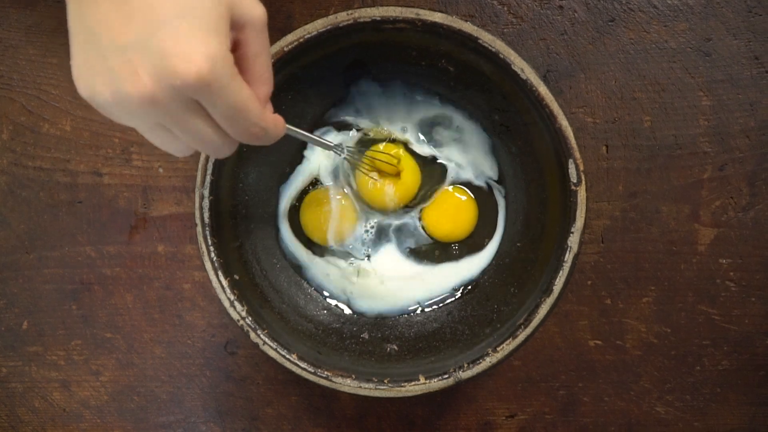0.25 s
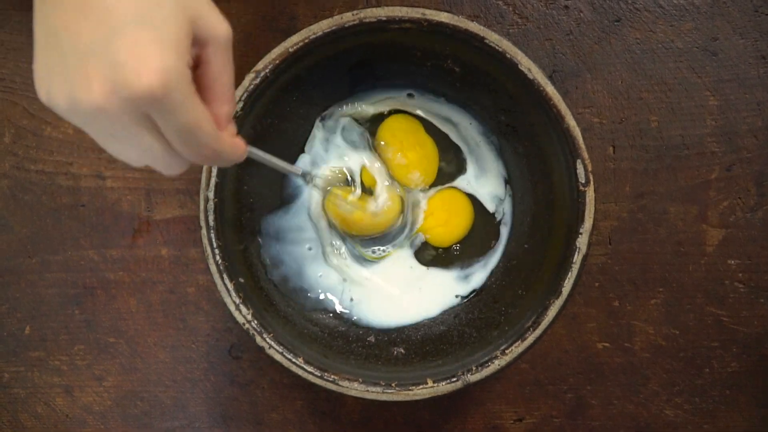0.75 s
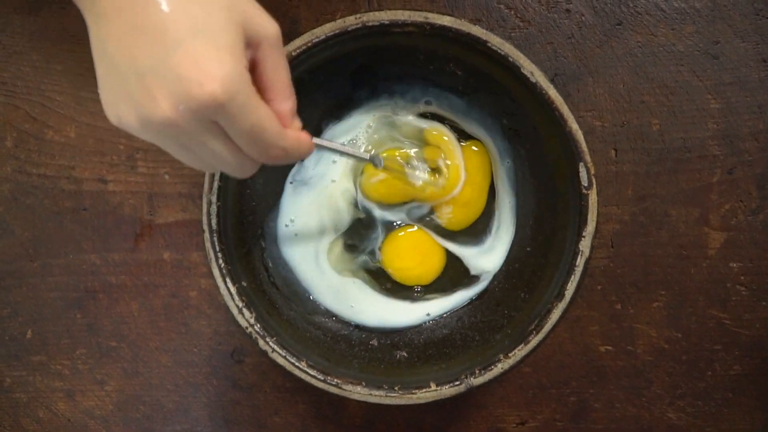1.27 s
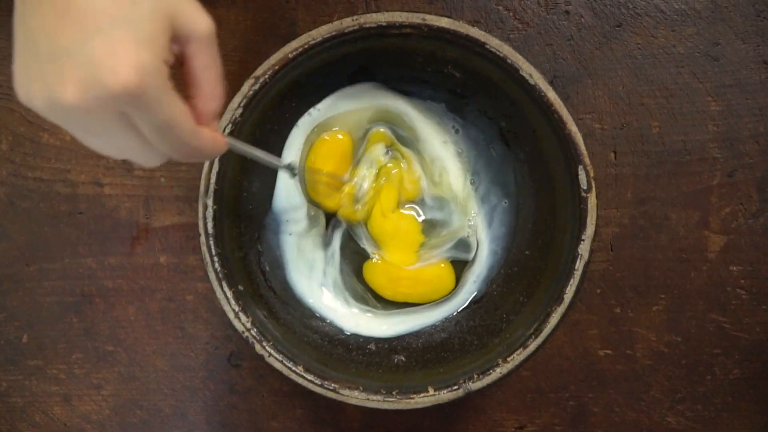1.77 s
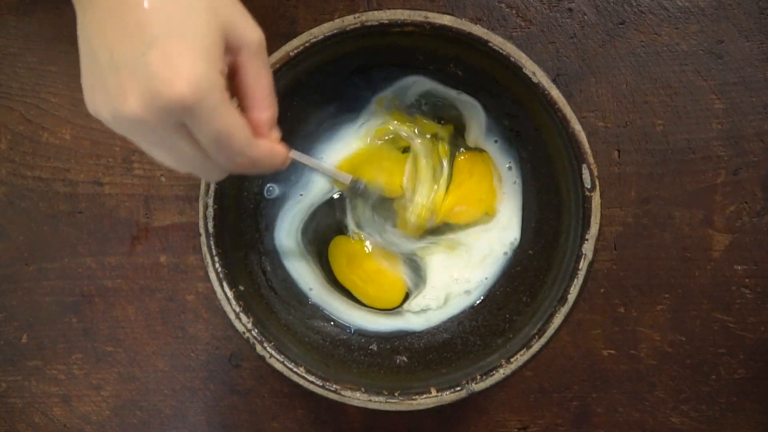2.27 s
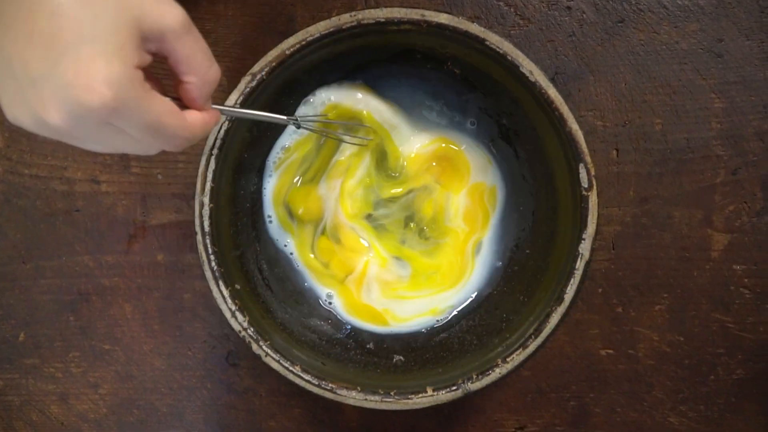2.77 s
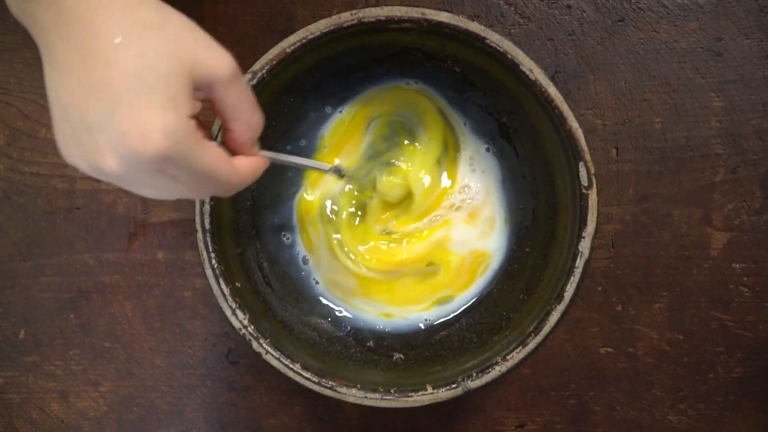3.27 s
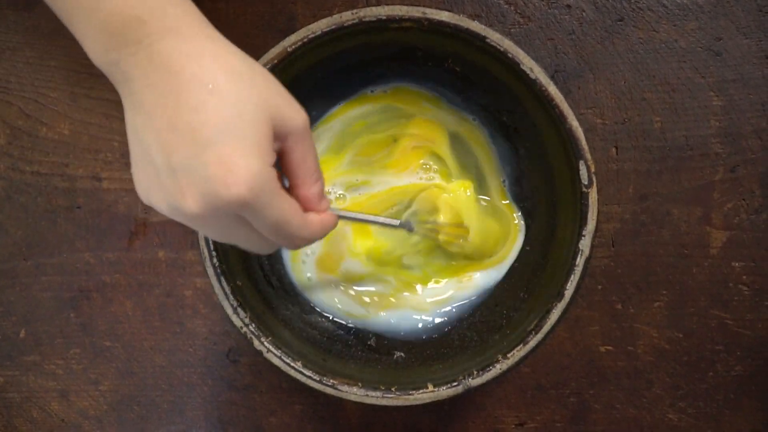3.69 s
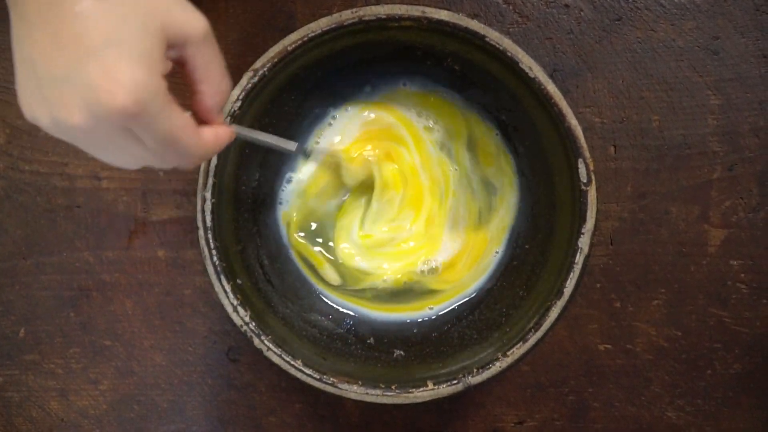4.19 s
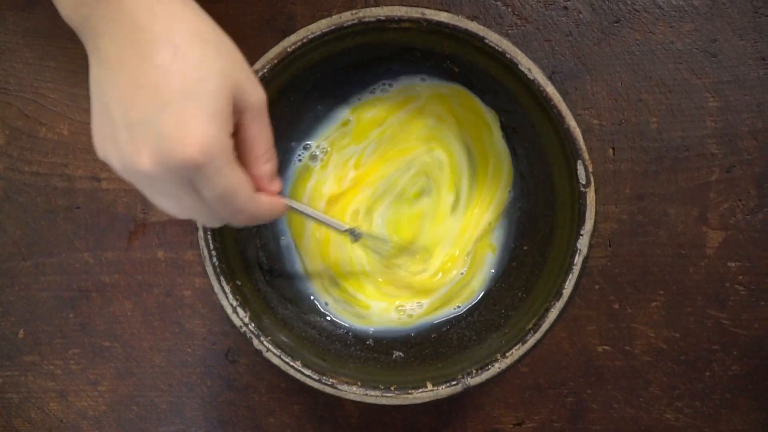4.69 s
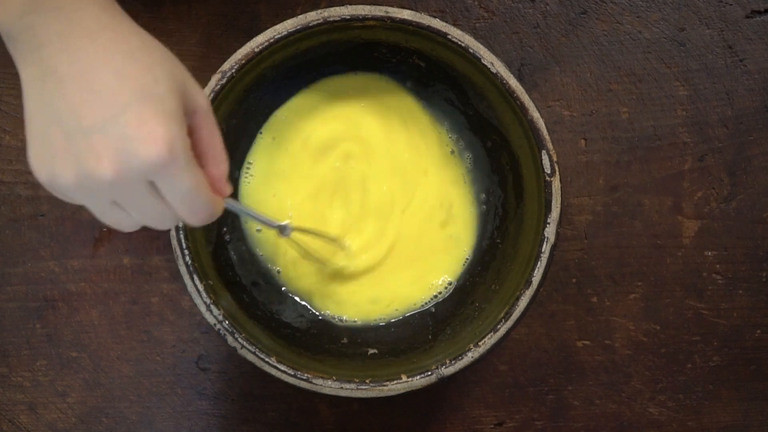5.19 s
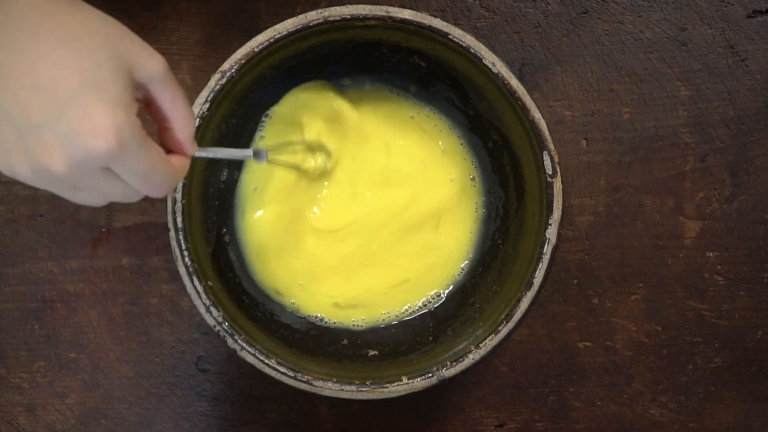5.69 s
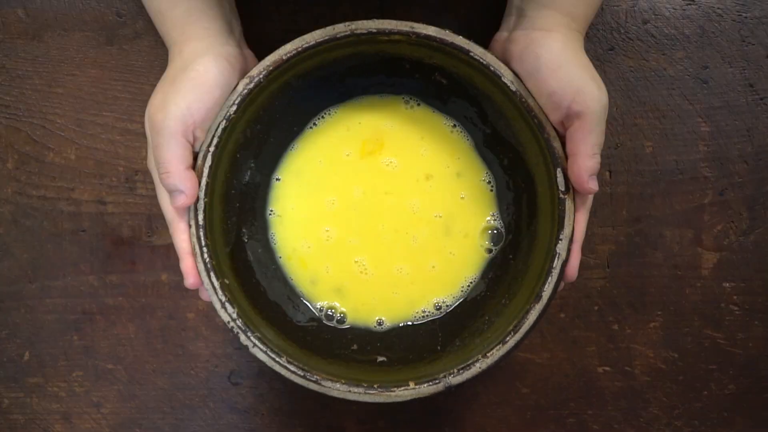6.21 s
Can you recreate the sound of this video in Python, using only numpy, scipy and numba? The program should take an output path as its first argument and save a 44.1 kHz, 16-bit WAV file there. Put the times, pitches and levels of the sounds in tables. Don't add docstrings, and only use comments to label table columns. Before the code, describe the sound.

Close up, a small wire whisk beats eggs in a stoneware bowl. Separate scraping ticks come first, loosely spaced, then strokes crowd together into a brisk clatter before settling to even strokes several times a second. Each lands with a sharp tick, chatters brightly over rough glaze and stops short, with damped ceramic clinks and small thuds beneath. Tiny wet pops fall between. The kitchen is quiet, with low hum and hiss and a brief room tail.

```python
import sys
import numpy as np
from scipy import signal
from scipy.fft import rfft, irfft
from scipy.io import wavfile
from scipy.ndimage import uniform_filter1d
from numba import njit

SR = 44100
rng = np.random.default_rng(int(sys.argv[2]) if len(sys.argv) > 2 else 0)


def boost_factor(decibels):
    exponent = np.asarray(decibels, float) / 20
    return 10 ** exponent


def to_wav(s):
    ch = np.atleast_2d(s).T
    pcm = np.round(np.clip(ch, -1, 1) * 32767)
    wavfile.write(sys.argv[1], SR, pcm.astype(np.int16))


N = 284438


def whisk(catches):
    t = np.arange(N) / SR
    force, flank_db, sing_hz, sheen_db = pressure(t)
    ticks, knocks, wall_hz, upper_hz = landings(t)
    wire, tip, wall, upper, base = force[[0, 0, 1, 2, 3]] * chatter(
        slips_per_s=12000, spread_db=1.83, judder_db=0.5, judder_hz=157.0, count=5)
    wire = wire + boost_factor(-8.0) * ticks
    tip = tip + boost_factor(-8.5) * ticks
    wall = wall + boost_factor(-4.5) * knocks
    upper = upper + boost_factor(-8.0) * knocks
    base = base + boost_factor(-25.0) * knocks

    wall_now = wall_hz * (1 + .025 * walk(60))
    upper_now = upper_hz * (1 + .035 * walk(60))
    bowl = ringing_wires(wire) + hissing_tips(tip, sheen_db) + singing_wire(tip, sing_hz)
    body = bowl_wall(wall, upper, wall_hz, wall_now, upper_now)
    body += bowl_flank((wall + wire) * boost_factor(flank_db))
    bowl += svf(body, np.full(N, 3100.), 1530.0)
    bowl += bowl_base(base, t)
    bowl -= 0.66 * svf(bowl, np.full(N, 3180.), 360.0)
    bowl -= 0.38 * svf(bowl, np.full(N, 1500.), 320.0)
    too_small_for_bass = signal.butter(2, 260, "high", fs=SR, output="sos")
    bowl = signal.sosfilt(too_small_for_bass, bowl)

    wall = wall + boost_factor(-16) * catches
    bowl += boost_factor(-28) * ring(wall, (wall_now + wall_hz) / 2, width=9)
    return bowl + free_rim(wall + upper, wire)


# touch-down in seconds,
# rise in seconds, fall in seconds, crest of the chatter in dB, touch-down against the crest in dB.
YOLK_STROKES = [(0.14, 0.0049, 0.051, -33, -2), (.213, 0.012, 0.03, -28, -24),
                (0.264, 0.026, 0.011, -30, -4), (0.415, 0.0017, 0.0095, -48, 13.5),
                (0.691, 0.059, 0.031, -27.5, -8), (0.875, 0.02, 0.016, -27, -13),
                (1.218, 0.021, 0.0073, -32, -3.5), (1.567, 0.031, 0.041, -24, -7.5),
                (1.647, 0.01, 0.0074, -39.5, 2), (1.89, 0.0095, 0.0093, -39.5, 12),
                (1.931, 0.0021, 0.03, -26, -1), (2.062, 0.031, 0.015, -30.5, 3.5),
                (2.208, 0.024, 0.0031, -23, -4), (2.378, 0.018, 0.0063, -26, 8),
                (2.533, 0.014, 0.014, -25, 2.5)]
BEAT_STROKES = [(2.771, 0.022, 0.032, -27.5, -10), (2.928, 0.036, 0.042, -23.5, -13),
                (3.103, 0.059, 0.052, -21.5, -21), (3.288, 0.0093, 0.0034, -31.5, 9),
                (3.311, 0.028, 0.0069, -24, -5), (3.3513, 0.0099, 0.036, -36, 11.5),
                (3.47, 0.0025, 0.01, -39, 14), (3.485, 0.02, 0.026, -20.5, -5),
                (3.539, 0.0042, 0.044, -28, -7), (3.657, 0.03, 0.054, -28, -14.5),
                (3.749, 0.016, 0.0056, -35.5, -4), (3.79, 0.016, 0.029, -22.5, 1.5),
                (3.837, 0.041, 0.014, -22.5, -15), (3.999, 0.055, 0.016, -24, -13)]
FINAL_STROKES = [(4.211, 0.0084, 0.012, -31, 3), (4.397, 0.015, 0.015, -24.5, -28),
                 (4.582, 0.0013, 0.016, -20.5, -2), (4.599, 0.017, 0.012, -25.5, -1),
                 (4.683, 0.0029, 0.012, -36.5, -16), (4.7712, 0.0016, 0.0047, -34, 11),
                 (4.781, 0.012, .003, -31, -13), (4.796, 0.035, 0.007, -19, -0.5),
                 (4.839, 0.053, .005, -36.5, 6.5), (4.983, 0.024, 0.0077, -27, 8),
                 (5.159, 0.016, 0.0038, -28, 1), (5.337, 0.021, 0.011, -30.5, 0),
                 (5.523, 0.029, 0.0099, -33.5, 4), (5.714, 0.016, 0.0022, -38.5, 2.5),
                 (6.052, 0.022, 0.0081, -27, -4)]
# wall ring, upper ring and flank ring against
# the chatter, all in dB, base thud in dB, pitch of the singing wire in Hz.
YOLK_CONTACTS = [(9, 12.5, -15, -38.5, 5800), (4.5, 10.5, -5.5, -39.5, 9700), (7.5, 6.5, -11, -42, 8600),
                 (20.5, -7, -23, -47, 6200), (1, 5.5, -7.5, -31, 8780), (9.5, 4.5, -12, -34, 8790),
                 (12.5, -1, -11, -37.5, 5750), (12.5, 5, -9.5, -33, 6980), (15, 10, -9, -40, 6800),
                 (0, -7, -19, -43.5, 8400), (-25, -1, -21, -34.5, 6460), (7, 9, -14, -33, 6200),
                 (7.5, 9.5, -10, -30, 6200), (11, 2.5, -16, -36.5, 8400), (5, 3.5, -8, -34, 7670)]
BEAT_CONTACTS = [(0.5, 3.5, -23, -34, 6720), (-6.5, 1.5, -11, -32.5, 6530), (-6, 3, -13, -32, 7300),
                 (7, -16, -16, -36, 6200), (8.5, 6.5, -9.5, -34.5, 8440), (11, 12.5, -13.5, -32.5, 9100),
                 (6, 14, -37, -44, 10680), (10.5, 4, -18, -33.5, 8000), (-1, 6, -12, -29.5, 6720),
                 (4, 6.5, -13.5, -30.5, 6400), (-2, -1, -5.5, -31.5, 8530), (-7.5, 1, -10, -29.5, 5500),
                 (2, 9, -12, -32, 5800), (6, 10, -10, -28, 4800)]
FINAL_CONTACTS = [(8, 7, -39, -39, 6940), (9, 5.5, -10, -33, 7100), (-1, 3.5, -32, -34.5, 6630),
                  (7.5, 5, -18, -39, 6030), (11, 13.5, -21, -33.5, 7400), (-9, 18.5, -38, -31, 12570),
                  (1, 13, -16, -41, 7490), (5.5, 5, -11, -34, 7430), (8.5, 6, -12, -32, 6720),
                  (4, 4.5, -9, -36.5, 5800), (10, 0, -4, -35.5, 4670), (10.5, 4, -1.5, -30, 4660),
                  (8.5, 5.5, -6, -31.5, 4995), (-7, -2.5, -15, -38.5, 8400), (11, -1, -8.5, -33.5, 5800)]
TIP_SHEEN_DB = [1, 1, -4, -0.5, 3.5, -2, 2.0, 2.0, -6.0, -7.0, 1.0, 10.0, 0.2, 4.0, 1.5, 2.5, 1.5, 9, 5.5,
                5, 3.5, 9.5, 5, -1, 0, 0.2, 3, 1.5, 3, 1.1, 3, 3, 4, 4.0, 9.0, 6.5, 1.5, 0, 0.2, 1, 2.5,
                4.0, 4, -0.5]


def pressure(t):
    lift_db, roundness = -13.5, 1.97
    wall_growth_db, upper_growth_db, base_growth_db = 5, 2, 0.5
    base_follow = 0.31
    at, rise, fall, crest_db, touch_db = np.transpose(YOLK_STROKES + BEAT_STROKES + FINAL_STROKES)
    stroke = np.maximum(np.searchsorted(at, t) - 1, 0)
    contacts = np.transpose(YOLK_CONTACTS + BEAT_CONTACTS + FINAL_CONTACTS)
    wall_db, upper_db, flank_db, base_db, sing_hz = contacts[:, stroke]
    since = t - at[stroke]
    rise = np.maximum(rise[stroke], 1e-3)
    fall = np.maximum(fall[stroke], 1e-3)

    swell = touch_db[stroke] * np.clip(1 - since / rise, 0, 1) ** roundness
    swell += lift_db * np.clip((since - rise) / fall, 0, 1) ** roundness
    dug = np.clip(since / (rise + fall), 0, 1) - .5
    wire_db = crest_db[stroke] + swell
    rows = [wire_db,
            wire_db + wall_db + wall_growth_db * dug + 2.4 * walk(70),
            wire_db + upper_db + upper_growth_db * dug + 2.6 * walk(70),
            base_db + base_follow * swell + base_growth_db * dug]
    touching = (since > 0) & (dug < .5)
    return boost_factor(np.array(rows)) * touching, flank_db, sing_hz, np.array(TIP_SHEEN_DB)[stroke]


# start in seconds, peak in dB,
# wall ring in Hz, upper ring in Hz, knock into the bowl in dB.
EARLY_LANDINGS = [(0.139, -16.5, 2730, 3630, 13.5), (0.2123, -8, 2590, 3600, 8),
                  (0.274, -14, 2620, 3560, -12), (0.417, -40, 2580, 3640, 16),
                  (0.6904, -7.5, 2580, 3900, -20), (0.8825, -27, 2625, 3780, 21),
                  (1.2184, -29, 2615, 3870, 19), (1.5673, -12, 2627, 3900, 3),
                  (1.8929, -13, 2570, 3870, -14), (1.935, -17, 2800, 3930, -15),
                  (2.0623, -15, 2490, 3790, 0), (2.2079, -8, 2543, 3920, 8), (2.377, -4, 2574, 3810, 10.5),
                  (2.534, -5, 2530, 3600, -4), (2.78, -12, 2585, 3720, 14), (2.9258, -14, 2590, 3830, -2),
                  (3.102, -20.5, 2670, 4230, 4), (3.1154, -11, 2650, 4050, 1),
                  (3.2885, -11, 2740, 3630, 6.5), (3.3213, -11, 2590, 3820, -3)]
LATE_LANDINGS = [(3.47, -5.5, 2700, 3830, 7), (3.4899, -10, 2740, 3900, 8), (3.5418, -18, 2670, 4000, 10),
                 (3.6577, -10.5, 2650, 3870, -1), (3.765, -25, 2690, 3730, -1.5),
                 (3.7958, 1, 2680, 3600, -5), (3.8554, -13, 2490, 3600, 6),
                 (4.0033, -32, 2650, 3730, -10.5), (4.0346, -12, 2627, 4060, -12),
                 (4.2122, -19, 2560, 3880, 12), (4.3996, -6, 2670, 3950, 1.5), (4.581, -25, 2660, 3670, -7),
                 (4.6854, -32, 2700, 3840, 0.5), (4.7715, -7.5, 2650, 3780, 0),
                 (4.798, -17, 2686, 3780, -6), (4.9808, -2.5, 2496, 3530, 3),
                 (5.159, -14, 2474, 3970, 14.5), (5.3398, -25, 2517, 3580, 18),
                 (5.5284, -9, 2460, 3600, -3), (5.7138, -13, 2480, 4080, -13),
                 (6.0526, -15, 2520, 4040, 10)]


def landings(t):
    at, tick_db, wall_hz, upper_hz, body_db = np.transpose(EARLY_LANDINGS + LATE_LANDINGS)
    last = np.maximum(np.searchsorted(at, t) - 1, 0)
    since = np.maximum(t - at[last], 0)
    knock = np.exp(-since / .0001) * 0.48
    rebound = rng.standard_normal(N) * np.exp(-since / 0.00058)
    ticks = boost_factor(tick_db[last]) * (since > 0) * (knock + rebound)
    return ticks, ticks * boost_factor(body_db[last]), wall_hz[last], upper_hz[last]


def chatter(slips_per_s, spread_db, judder_db, judder_hz, count):
    shape = (count, N)
    slips = (rng.random(shape) < slips_per_s / SR) * rng.standard_normal(shape)
    uneven_db = spread_db * np.minimum(rng.exponential(size=shape), 4.0)
    x = slips * boost_factor(uneven_db + judder_db * walk(judder_hz))
    return x / np.std(x)


# pitch in Hz, width in Hz, level in dB.
WIRES = [(5070, 350, -3.5), (5700, 530, 1.5), (6360, 360, 2), (6870, 730, 1), (7830, 380, 0.5),
         (8160, 336, -2.5), (8830, 700, 3)]


def ringing_wires(wire):
    return boost_factor(-11) * resonate(wire, WIRES, patchy_db=4.2)


# pitch in Hz, width in Hz, level in dB.
SHEEN = [(10200, 2100, -3), (11190, 600, -3), (12170, 1700, -3.5), (15200, 3100, -11.5)]


def hissing_tips(tip, sheen_db):
    scrape = boost_factor(-20) * ring(tip, np.full(N, 8000.), width=7000)
    return scrape + boost_factor(-9.5) * resonate(tip * boost_factor(sheen_db), SHEEN, patchy_db=3.)


def singing_wire(tip, sing_hz):
    level_db = -5 - 4 * (sing_hz > 9500)
    note_hz = np.minimum(sing_hz * (1 + .03 * walk(25)), .45 * SR)
    return ring(tip * boost_factor(level_db), note_hz, width=220)


def bowl_wall(wall, upper, wall_hz, wall_now, upper_now):
    body = boost_factor(-2) * ring(wall, wall_now, width=150)
    body = svf(body, wall_hz, 470.0)
    body += boost_factor(-3) * ring(upper, upper_now, width=240)
    body += boost_factor(-10) * ring(wall, np.full(N, 2720.), width=300)
    body += boost_factor(-5) * ring(upper, np.full(N, 3950.), width=700)
    return body * boost_factor(-4.0)


# pitch in Hz, width in Hz, level in dB.
FLANK = [(1780, 170, -5), (2010, 150, -1), (2300, 200, -14)]


def bowl_flank(push):
    return boost_factor(-1.5) * resonate(push, FLANK, patchy_db=1.5)


# pitch in Hz, width in Hz, level in dB.
BASE = [
    (368, 51, 5.5),
    (592.6, 42, 4.5),
    (780, 140, -2.5),
    (1046, 195, 5),
    (1143, 210, 8.5),
]


def bowl_base(base, t):
    mixed = t > 4.94
    foot = boost_factor(-12.0 + 2 * mixed) * resonate(base, BASE[:2], patchy_db=2.5)
    belly = boost_factor(-10.5 - 5 * mixed) * resonate(base, BASE[2:], patchy_db=2.3)
    return foot + belly


# pitch in Hz, time to die by 60 dB in seconds,
# level in dB.
RIM = [(2580, .3, -28), (2655, .24, -30), (3620, .13, -32), (3900, .15, -30), (6900, .1, -30),
       (7800, .13, -27)]


def free_rim(push, wire):
    rim = [(hz, np.log(1000) / np.pi / t60, db) for hz, t60, db in RIM]
    low = boost_factor(-5.0) * resonate(push, rim[:2])
    middle = boost_factor(2.0) * resonate(push, rim[2:4])
    return low + middle + resonate(wire, rim[4:])


# crest in seconds, peak in dB, pitch in Hz.
WALL_SNAGS = [(0.1409, -17.5, 2725), (0.1833, -20, 2760), (0.2208, -19, 2630), (0.7382, -20, 2590),
              (1.5935, -17, 2750), (1.6059, -15, 2770), (1.62, -13, 2610), (1.633, -13, 2545),
              (1.6478, -21, 2790), (1.9039, -23, 2506), (2.2091, -12.5, 2780), (2.2316, -19, 2350),
              (2.3785, -11.5, 2580), (2.3934, -11, 2580), (2.5432, -18, 2680), (2.785, -16.5, 2560),
              (3.1442, -19, 2600), (3.1641, -15.5, 2545), (3.2897, -21, 2640), (3.3206, -15, 2700),
              (3.3403, -11.5, 2580), (3.3609, -20, 2770), (3.3694, -18, 2660), (3.5013, -2, 2760),
              (3.5111, -10, 2720), (3.5231, -9.5, 2670), (3.5452, -18, 2770), (3.5661, -23, 2680),
              (3.6815, -22, 2690), (3.6909, -21, 2680), (3.7084, -21, 2610), (3.8723, -17.0, 2550),
              (3.8831, -18.5, 2660), (4.0456, -9, 2650), (4.0654, -10.5, 2560), (4.4169, -13, 2680),
              (4.584, -16.5, 2670), (4.62, -16, 2635), (4.7985, -7.5, 2690), (4.8098, -7.5, 2710),
              (4.833, -2, 2660), (4.8551, -23, 2640), (4.9893, -18.0, 2460), (5.004, -21, 2530),
              (5.024, -24, 2500), (5.0451, -20, 2800), (5.1795, -18, 2620), (5.3585, -23, 2535),
              (5.5296, -16.5, 2490), (6.0622, -16, 2564), (6.0752, -12, 2597)]
UPPER_SNAGS = [(0.1547, -19, 3640), (0.1854, -18.5, 3930), (0.2324, -12, 3600), (0.7583, -18, 3900),
               (1.5859, -13.5, 3820), (1.6101, -7, 3890), (2.0909, -15, 3590), (2.2087, -25, 3900),
               (2.2193, -17, 3800), (2.2289, -5, 3850), (2.3779, -32, 3760), (2.5347, -16, 3800),
               (2.5494, -14.5, 3780), (2.7882, -23, 3880), (2.8068, -17, 3800), (2.9652, -18.5, 3910),
               (2.9741, -16.5, 3770), (3.1387, -12.5, 3830), (3.1521, -9.5, 3880), (3.1627, -7, 3700),
               (3.1754, -10, 3820), (3.3305, -15, 3830), (3.3376, -17, 3700), (3.3554, -11.5, 3660),
               (3.3606, -17, 3630), (3.3712, -18, 3800), (3.4758, -15, 3870), (3.4951, -6, 3830),
               (3.5448, -13, 3920), (3.5694, -21.5, 3790), (3.6966, -14, 3800), (3.8069, -19, 3740),
               (3.8322, -17, 3600), (3.841, -14.5, 3630), (3.8647, -4, 3810), (3.8798, -6, 3820),
               (4.0207, -14, 3620), (4.0273, -16, 3800), (4.0403, -9, 3810), (4.0624, -14, 3780),
               (4.4003, -19.5, 3730), (4.5858, -8.5, 3610), (4.6121, -15, 3860), (4.7727, -19, 3900),
               (4.8019, -8.5, 3910), (4.8097, -10, 3700), (4.8194, -7.5, 3800), (4.8432, -21, 3830),
               (4.8567, -19, 4020), (4.9873, -16, 3740), (5.1606, -18.5, 3930)]
# crest in seconds, lower foot ring in dB,
# higher foot ring in dB.
THUDS = [(0.7489, -34, -22.5), (0.8883, -33.5, -26.5), (1.624, -30, -38.0), (1.9421, -56, -29.5),
         (2.0806, -39, -26), (2.2129, -39, -23.5), (2.3816, -27.5, -27.5), (2.7819, -46, -35),
         (2.9513, -25, -28.5), (3.1459, -39, -26), (3.1792, -45, -21), (3.3657, -32, -26),
         (3.3893, -33, -29), (3.5249, -28, -30), (3.5716, -27.5, -36), (3.7193, -31, -29),
         (3.8016, -29, -15.5), (3.8881, -29.5, -39), (4.0238, -22.5, -27), (4.0434, -34, -19),
         (4.0665, -28, -27), (4.2257, -28, -28.5), (4.7754, -32.5, -42.5), (4.8198, -49, -29),
         (4.8848, -36, -29), (5.009, -30, -38), (5.1731, -38.0, -28), (5.353, -30, -40.5),
         (5.5333, -21.5, -26), (5.7256, -26, -45), (6.0747, -35, -28.5)]
# crest in seconds, belly ring in dB, flank ring in dB.
BUMPS = [(0.2303, -34, -40), (0.7573, -45, -22), (1.594, -33, -22), (1.6096, -25.5, -20),
         (2.2094, -32, -23), (2.3785, -26.5, -30), (2.3909, -33, -23), (2.5507, -43, -33),
         (2.7914, -23.5, -36), (2.9444, -26.5, -38.0), (3.1728, -27, -28), (3.3326, -37.0, -38),
         (3.3608, -34.0, -36.5), (3.4735, -28, -51.0), (3.5074, -46, -22), (3.6616, -31, -47.0),
         (3.726, -25, -43), (3.8005, -25, -23), (3.8661, -27, -38.0), (3.8855, -39.0, -23),
         (4.0174, -24, -44), (4.0644, -28, -20), (4.4204, -36, -25.5), (4.6246, -33, -25.5),
         (4.7735, -30, -43), (4.8288, -30, -18), (5.0017, -31, -32), (5.1608, -56, -23), (5.3512, -44, -24),
         (5.5349, -35, -27), (6.0739, -37, -28)]


def snags():
    out = swells(WALL_SNAGS, rise_s=0.00218, gain_db=-1.0, rough=0.057)
    out += swells(UPPER_SNAGS, rise_s=0.001612, gain_db=-1.0, rough=0.16)
    foot_hz, curve_hz = (382, 588), (1153, 1868)
    for rows, pair_hz, rise_s in (THUDS, foot_hz, .0035), (BUMPS, curve_hz, .0022):
        single = [(s, db, hz) for s, *levels in rows for db, hz in zip(levels, pair_hz)]
        out += swells(single, rise_s, gain_db=-3.5, rough=0.11)
    return out


def swells(rows, rise_s, gain_db, rough):
    out = np.zeros(N)
    x = np.arange(1024) / SR / rise_s
    shape = x * np.exp(1 - x)
    for s, db, hz in rows:
        i = int((s - rise_s) * SR) + np.arange(len(x))
        out[i] += boost_factor(db + gain_db) * shape * np.sin(2 * np.pi * hz * x * rise_s)
    return out * (1 + rough * walk(900))


# start in seconds, peak in dB, pitch in Hz.
POPS = [(1.277, -17.5, 5830), (1.51, -27, 4500), (1.511, -25, 5700), (1.9023, -11.5, 2480),
        (2.0437, -22, 6400), (2.4858, -16, 6500), (3.075, -41, 3800), (3.397, -16, 5500),
        (3.4605, -30, 13000), (4.394, -30, 8200), (4.9445, -22.5, 3080), (4.9455, -19, 7560),
        (5.025, -19, 2520), (5.044, -6, 3170), (5.05, -21, 3000), (5.637, -31.5, 6490),
        (5.868, -25.5, 3600), (5.9794, -36, 5860), (5.9796, -34, 7800)]


def pops():
    out = np.zeros(N)
    t = np.arange(int(.02 * SR)) / SR
    for s, db, hz in POPS:
        sagging = hz * t * (1.03 - 12 * t)
        burst = np.sin(2 * np.pi * sagging) * np.exp(-t * hz / 5.9)
        snap = np.diff(rng.standard_normal(len(t) + 2), 2)
        burst += 0.31 * snap * np.exp(-t / 0.00028)
        out[int(s * SR):][:len(t)] += boost_factor(db - 5.5) * burst
    return out


def room(x, t60_s, wet_db, side_db):
    t = np.arange(int(.4 * SR)) / SR
    tail = rng.standard_normal((2, len(t))) * boost_factor(-60 * t / t60_s) * (t > .003)
    mid, side = (signal.fftconvolve(x, h / np.linalg.norm(h))[:N] for h in tail)
    return x + boost_factor(wet_db) * mid + boost_factor(side_db) * side * np.array([[1], [-1]])


# pitch in Hz, level per Hz in dB.
KITCHEN = [(21, -30), (36, -3), (60, -5), (95, -18), (215, -14), (238, -6.5), (323, -10), (376, -6.5),
           (439, -11.5), (498, -5), (789, -11.5), (919, -12.5), (1420, -18.5), (1980, -23.5), (16000, -32)]
# pitch in Hz, left-right difference against the middle in dB.
KITCHEN_SIDE = [(60, -17.5), (110, 2), (200, -16), (380, -25), (700, -27.5), (1290, -21), (2380, -6),
                (4400, -6), (8120, -5), (15000, -4)]
# pitch in Hz, width in Hz, level in dB.
HUM = [(49.9, 24, -60.5), (64, 11.5, -68), (186.7, 6.7, -66), (765, 2.8, -61)]


def kitchen():
    hz, db = np.transpose(KITCHEN)
    side_hz, side_db = np.transpose(KITCHEN_SIDE)
    mid = coloured(KITCHEN)
    wide_db = db + np.interp(np.log(hz), np.log(side_hz), side_db)
    side = coloured(np.transpose([hz, wide_db]))
    hum = resonate(rng.standard_normal(N), HUM)
    return boost_factor(-49) / np.std(mid) * (mid + side * np.array([[1], [-1]])) + hum


def coloured(points):
    hz, db = np.transpose(points)
    grid = np.log(np.maximum(np.fft.rfftfreq(N, 1 / SR), 1))
    return irfft(rfft(rng.standard_normal(N)) * boost_factor(np.interp(grid, np.log(hz), db)), N)


def walk(rate_hz):
    hold = int(SR / rate_hz)
    levels = rng.uniform(-1.7, 1.7, N // hold + 1)
    return uniform_filter1d(np.repeat(levels, hold)[:N], hold)


def resonate(x, modes, patchy_db=0.):
    out = np.zeros(N)
    for k, (hz, width, db) in enumerate(modes):
        fed = x * boost_factor(db + patchy_db * walk(30))
        out += (-1) ** k * ring(fed, np.full(N, 1. * hz), width)
    return out


def ring(x, hz, width):
    return svf(x, np.ascontiguousarray(hz), 1. * width) * np.sqrt(SR / np.pi / width)


@njit
def svf(x, hz, width):
    y, b, l, g, k = np.empty(len(x)), 0., 0., 0., 0.
    for i in range(len(x)):
        if i == 0 or hz[i] != hz[i - 1]:
            g, k = np.tan(np.pi * hz[i] / SR), width / hz[i]
        v = (b + g * (x[i] - l)) / (1 + g * (g + k))
        b, l, y[i] = 2 * v - b, l + 2 * g * v, k * v
    return y


# start in seconds, end in seconds.
PAUSE = (4.892, 4.94)


def scene():
    t = np.arange(N) / SR
    sounding = uniform_filter1d(1. * ((t < PAUSE[0]) | (t > PAUSE[1])), size=130)
    fade = np.maximum(sounding, boost_factor(-18))
    catches = snags()
    bowl = (whisk(catches) + catches) * sounding + pops()
    return room(bowl, t60_s=0.2, wet_db=-14, side_db=-65) * fade + kitchen()


def low_pass(x):
    return signal.sosfilt(signal.butter(12, 16990, fs=SR, output="sos"), x)


def record(dry):
    rounded = 1.1 * np.tanh(dry / 1.1)
    top = signal.ellip(8, .2, 60, 15750, fs=SR, output="sos")
    return low_pass(signal.sosfilt(top, rounded))


dry = scene()
out = record(dry)
to_wav(out)
```